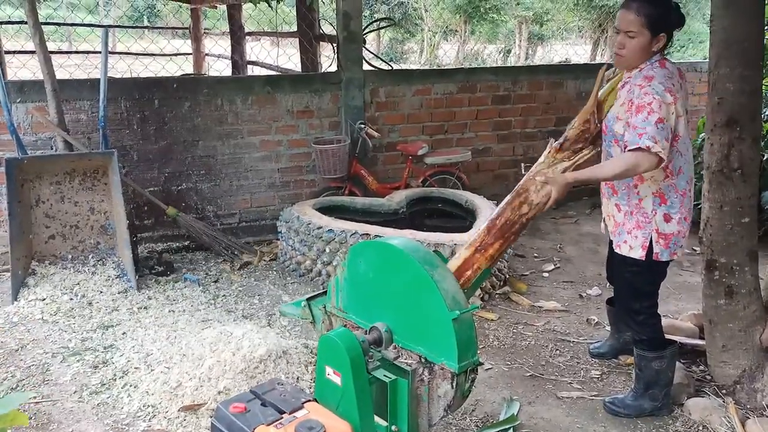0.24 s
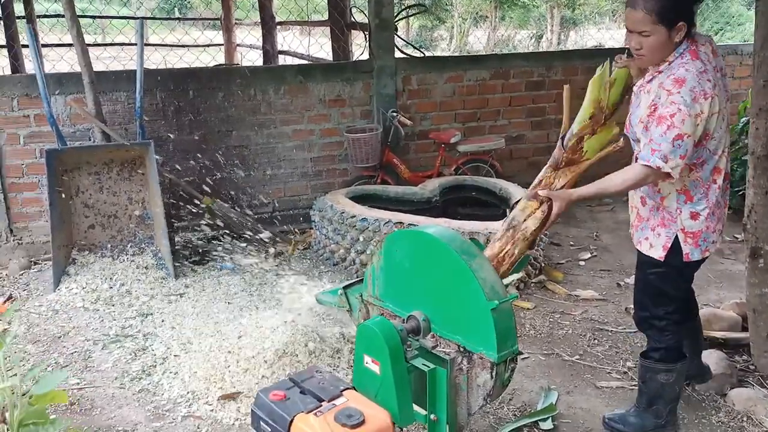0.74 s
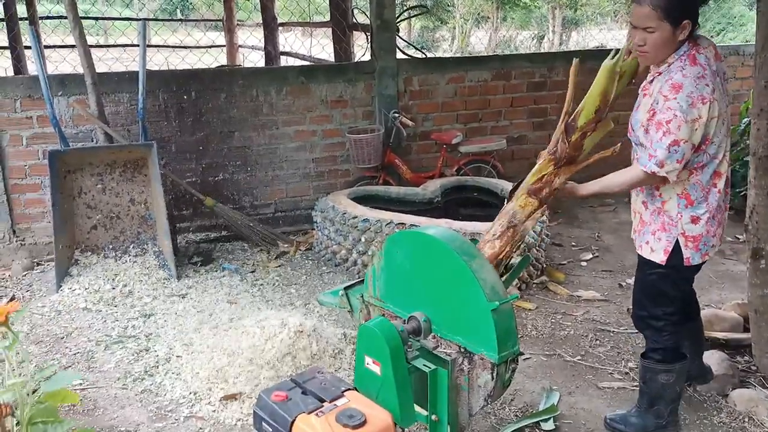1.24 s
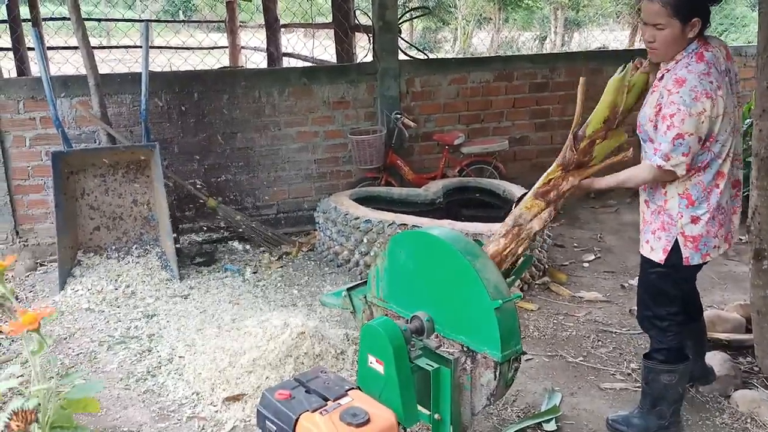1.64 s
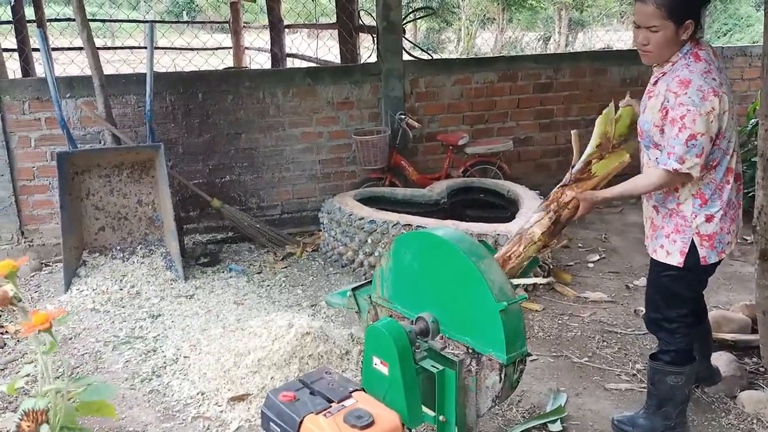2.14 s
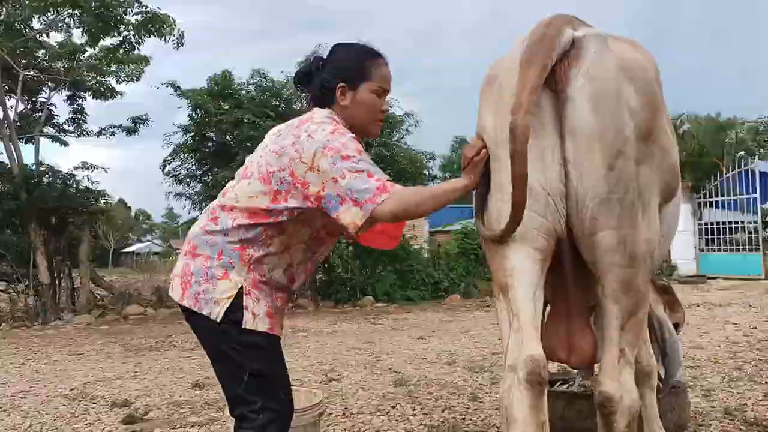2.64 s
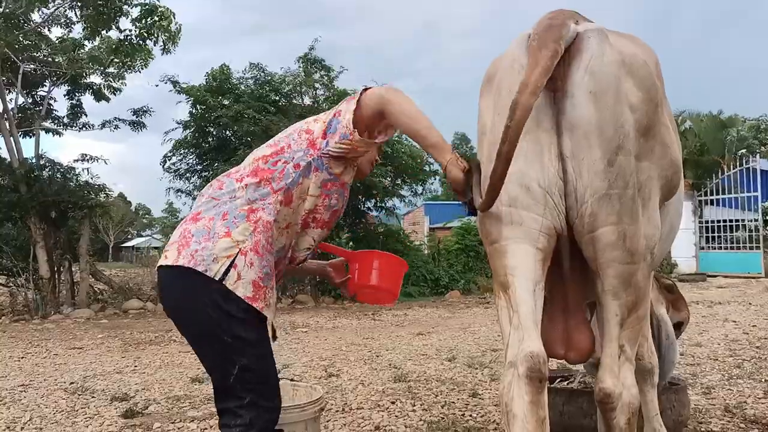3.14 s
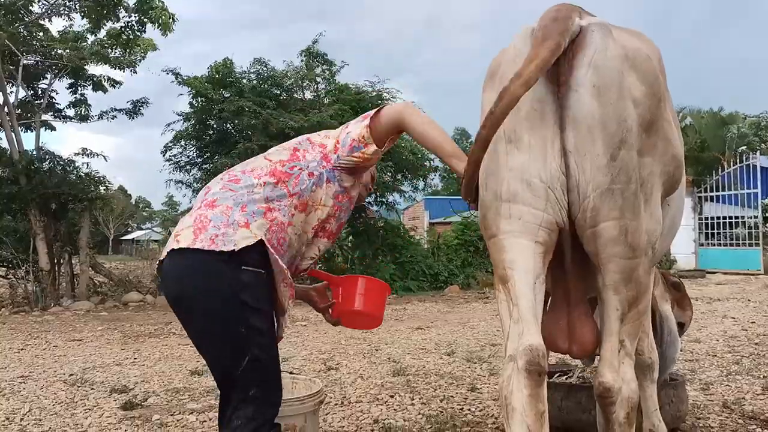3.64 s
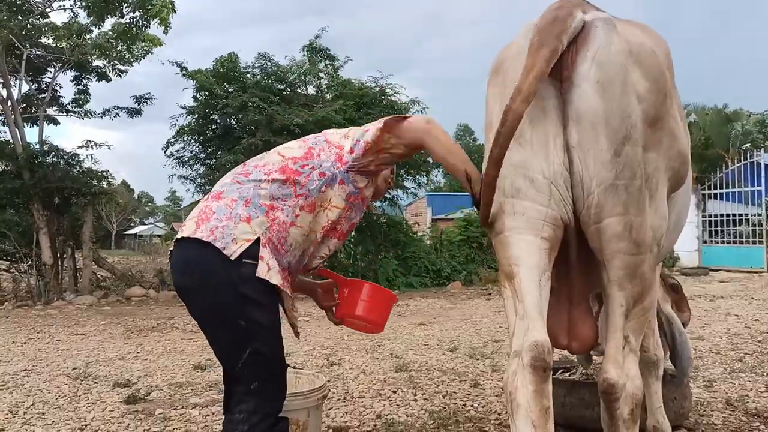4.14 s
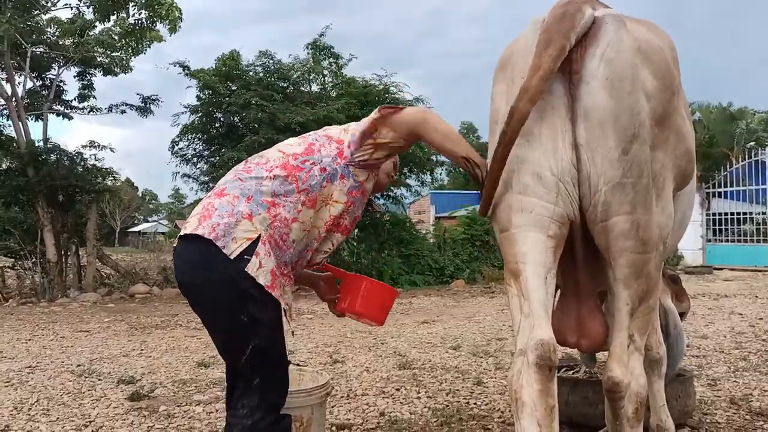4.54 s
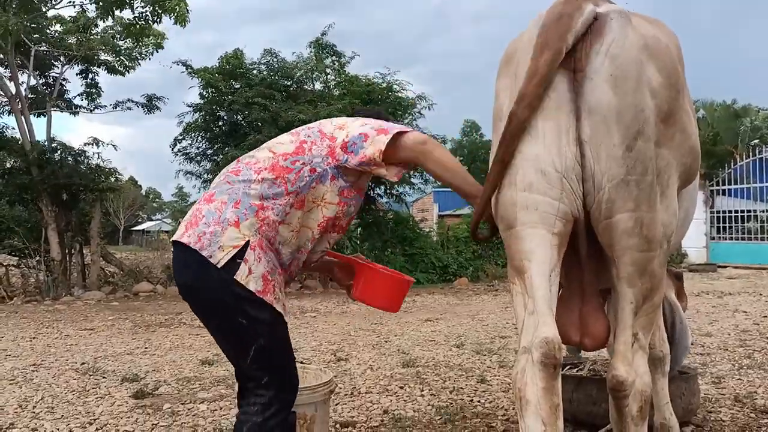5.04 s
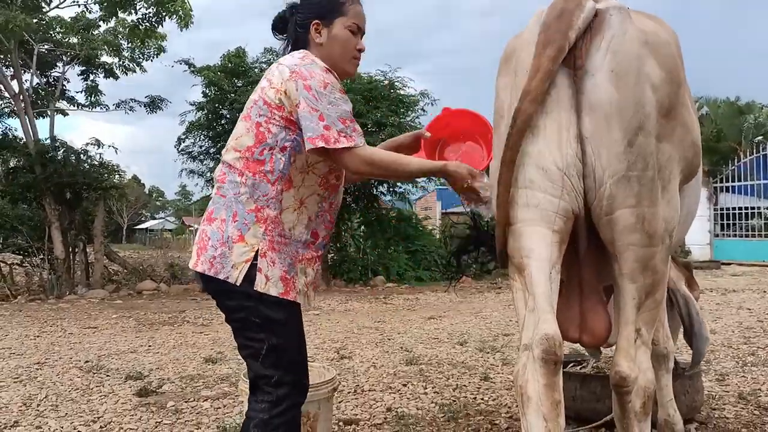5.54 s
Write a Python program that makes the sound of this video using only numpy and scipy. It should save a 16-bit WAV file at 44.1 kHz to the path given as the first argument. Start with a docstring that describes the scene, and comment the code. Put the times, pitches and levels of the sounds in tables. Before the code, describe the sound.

Loud outdoor machine noise, booming exhaust, clanking casing and crackling fibre, slightly overloaded at the microphone. Then a hard cut to calm yard air with low wind bumps and a click on the right. A rooster crows in three bursts, a fainter rooster rasps back, birds whistle, a hand softly rubs hide, and thrown water slaps and drips.

```python
"""First a one-cylinder petrol engine thuds and a forage chopper shreds a stalk: gas pulses boom
through a muffler, knocks ring a steel casing, and dense clicks make the snapping fibre.
Abruptly an open farmyard follows: noise makes the air and the wind buffets, a near rooster crows with
bending, hoarse tones, a quieter one answers and ends in rasps, and gliding tones make small birds.
Meanwhile grains of noise rub a cow's hide, and near the end water splashes and bubbles ring."""
import sys
import numpy as np
from scipy import signal
from scipy.fft import rfft, irfft
from scipy.io import wavfile

SR = 44100
rng = np.random.default_rng(int(sys.argv[2]) if len(sys.argv) > 2 else 0)


def store_pcm(level_fs):
    """Save levels as 16-bit WAV."""
    pcm = np.round(np.clip(level_fs, -1, 1) * 32767).astype(np.int16)
    wavfile.write(sys.argv[1], SR, np.atleast_2d(pcm).T)


N = 256220
T = np.arange(N) / SR  # time of every sample, in seconds

# Engine speed, sagging and recovering. Each row: time in seconds, firings per second.
ENGINE_SPEED = [(.14, 23.58), (.31, 23.84), (.48, 23.27), (.66, 21.83), (.84, 23.04), (1.01, 22.85),
                (1.3, 23.68), (2.16, 24.66), (2.56, 22.92)]
# Gas pulses of one cycle, exhaust then intake. Each row: place as a share of the cycle, signed strength,
# unevenness in dB.
GAS_PULSES = [(-.19, -1., 1.1), (.095, .95, .8)]
# Tone colour of the muffler. Each row: frequency in Hz, relative level in dB.
MUFFLER = [(20, -28), (95, -26), (118, 3), (195, 5), (255, -2.5), (285, 1), (340, -30), (600, -21),
           (12000, -54.5)]
# Boom of the air box, swelling and sinking. Each row: time in seconds, gain at its resonance in dB.
AIR_BOX = [(.38, 3), (.65, -0.5), (.7, 11), (.84, -3), (1.18, -2), (1.52, 8.5), (1.8, 3.5), (2.16, 12.5),
           (2.26, 4)]
# Tone colour of the steel casing. Each row: frequency in Hz, relative level in dB.
CASING = [(30, -7.5), (320, -2), (520, -6.5), (680, -3.5), (1600, -3), (2100, -7.5), (2600, -18),
          (12000, -42.5)]
# Ringing tones of the casing. Each row: frequency in Hz, width in Hz, gain in dB.
CASING_MODES = [(639, 26, -1), (815, 31, 1), (1507, 45, -2)]
# Chunks of stalk tumbling on a panel. Each row: start in seconds, length in seconds, level in dB,
# panel pitch in Hz.
CHUNKS = [(0.428, 0.14, -29, 380), (0.678, 0.32, -34.5, 1300), (1.428, 0.065, -23, 1470),
          (1.882, 0.78, -37.5, 410)]
# Tone colour of the shredded pulp. Each row: frequency in Hz, gain in dB.
PULP = [(500, -8), (2000, 0.5), (4500, 1.5), (9000, -2), (15500, -11.5)]
# The stalk is pushed into the blades. Each row: start in seconds, length in seconds, extra cutting in dB.
FEEDS = [(0.22, 0.27, 5.5), (0.578, 0.24, 3.5), (1.998, 0.47, 4)]
# The blades bite tough fibre. Each row: start in seconds, peak in dB before a shared lift.
BITES = [(0.371, -34), (0.4367, -26.5), (1.4395, -34.5)]

# Syllables of the near crow, one list each. Each row: time in seconds, pitch in Hz, effort in dB,
# beak opening from 0 to 1.
CROW = [
    [(3.033, 785, -51, 0.88), (3.07, 716, -44, 0.58), (3.102, 789, -37.5, 0.86),
     (3.162, 766.5, -35.5, 0.65), (3.184, 737, -50, 0.76), (3.208, 824, -45, 0.9)],
    [(3.35, 739, -46, 0.26), (3.377, 789, -32.5, 0.15), (3.395, 848, -33, 0.72), (3.428, 854, -34.5, 0.7),
     (3.456, 722, -40.5, 0.15)],
    [(3.54, 922, -53, 0.2), (3.572, 760, -35, 0), (3.652, 799, -29, 0.26), (3.672, 779.6, -31, 0.1),
     (3.84, 764, -33, 0.03), (3.905, 738, -33.5, 0.43), (3.95, 709, -46, 0)],
]
# The far rooster's answer. Each row: time in seconds, pitch in Hz, effort in dB, beak opening from 0 to 1.
ANSWER = [(4.15, 772, -48, 0.9), (4.2, 697, -55.5, 0.8), (4.3, 708, -53.5, 0.76), (4.44, 663, -58, 0.83)]
# Hoarse rasps of the far crow. Each row: start in seconds, length in seconds, starting pitch in Hz,
# starting level in dB in the upper throat resonance, then in the lower.
RASPS = [(4.004, 0.22, 567.6, -66, -64.5), (4.43, 0.4, 567, -56.5, -60.5),
         (4.923, 0.049, 535.5, -71, -50.5)]
# Harmonics of the voice with the beak narrow: one relative level in dB each, from the first upward.
BEAK_NARROW = [3, 10, -31.5, -26, -21]
# The same harmonics with the beak wide: one relative level in dB each.
BEAK_WIDE = [-9.5, -1.5, 3.5, -11, -26]
# Small birds' chirps. Each row: start in seconds, starting pitch in Hz, fall as a share of it, level in dB.
CHIRPS = [(4.061, 5370, 0.05, -63), (4.525, 5700, 0.2, -69), (4.89, 5300, 0.15, -67),
          (5.25, 5200, 0.16, -74), (5.39, 4050, .15, -80), (5.57, 3980, .05, -76)]
# Another bird's level whistles. Each row: start in seconds, level in dB.
WHISTLES = [(4.189, -64), (4.827, -64.5), (5.489, -69)]
# Echo of trees and sheds. Each row: frequency in Hz, gain in dB.
YARD_ECHO = [(400, 5), (750, 6.5), (1500, 6.5), (2400, 3.5), (5000, -25)]

# Wind buffets. Each row: start in seconds, length in seconds, level in dB, top frequency in Hz,
# left minus right in dB.
BUFFETS = [(2.565, 0.075, -16, 233, -25), (2.582, 0.013, -20.5, 453, -29), (2.639, 0.046, -12.5, 236, -28),
           (2.737, 0.14, -36.5, 126, -35), (2.889, 0.04, -28, 142, -10), (2.918, 0.18, -34, 153, 19),
           (3.016, 0.0152, -22, 237, 23), (3.726, 0.26, -36, 150, 13), (4.13, 0.036, -38, 226, 1.5),
           (4.628, 0.042, -35, 68.6, -36)]
# Tone colour of the open air. Each row: frequency in Hz, relative level in dB.
AIR = [(15, -25), (25, 6.5), (112, 4.5), (952, -24), (1460, -16), (2800, -26), (7500, -31), (15000, -37)]
# Loudness of the open air. Each row: time in seconds, level in dB.
AIR_LEVEL = [(2.57, -50.5), (5.0, -50.5), (5.48, -57.5), (5.8, -51.5)]
# Tones of a distant hum. Each row: frequency in Hz, relative level in dB.
HUM = [(161.5, -1.5), (323, -9)]
# Loudness of the hum. Each row: time in seconds, level in dB.
HUM_LEVEL = [(3.5, -70), (5.0, -51.5), (5.3, -66.5)]

# A hand strokes wet hide. Each row: time of the peak in seconds, level in dB.
RUBS = [(2.85, -56), (5.02, -64.5)]
# Tone colour of the hide. Each row: frequency in Hz, relative level in dB.
HIDE = [(1000, -17), (3000, -15), (9500, 6)]
# A wet hand slaps; water is thrown, lands and runs off. Each row: start in seconds, level in dB,
# decay in seconds, brightness from 0 to 1.
SPLASHES = [(4.139, -42, 0.039, 0.2), (5.539, -35, 0.043, 0.03), (5.653, -48.5, 0.039, 0.74),
            (5.73, -61, 0.21, 1)]
# Tone colour of sloshing water. Each row: frequency in Hz, relative level in dB.
SLOSH = [(60, 10), (220, -1.5), (400, 0), (650, -20), (2100, -13.5), (3800, -47)]
# Tone colour of spattering water. Each row: frequency in Hz, relative level in dB.
SPRAY = [(700, -3), (1500, 7), (4000, -4)]
# Single drops that trap a bubble. Each row: start in seconds, starting pitch in Hz, level in dB.
DROPS = [(5.68, 4830, -48), (5.694, 1480, -53), (5.715, 7450, -42)]

# Tone colour of the left microphone port. Each row: frequency in Hz, gain in dB.
LEFT_PORT = [(2800, -1.5), (5800, -8), (6700, -20.5), (8000, -7), (9600, 5.5), (11000, -4), (14200, -9.5)]
# Tone colour of the right microphone port. Each row: frequency in Hz, gain in dB.
RIGHT_PORT = [(1500, -1.5), (2400, -3), (4400, 1.5), (6000, 0.5), (7050, 8), (8000, -4.5), (9200, -9.5),
              (9900, -26), (12700, -3), (15400, -1)]
# How alike left and right are. Each row: frequency in Hz, likeness from 0 to 1.
LIKENESS = [(40, 0.2), (150, 1), (600, 0.84), (1400, 0.31), (5000, 0.091)]

CHANGE_S = 2.568  # the chopper gives way to the farmyard
FIRST_CYCLE_S = .0601
CUTTING_DB, FEED_RISE_S, FEED_EASE_S = -37, 0.13, 0.16  # steady cutting; how a push builds and eases
KNOCK_DB = -5  # knocks compared with the rattle
ROOSTER_LAG_S = 0.00041  # it stands to the right, so the left port hears it later
ROUGH_MIDDLE, ROUGH_ENDS, ROUGH_S = 0.057, 0.61, 0.023  # a syllable is hoarse as it starts and stops
DOUBLING, DOUBLING_HZ = 0.36, 820  # above this pitch the syrinx beats strong and weak by turns
VOICE_EDGE_S = 0.0055  # attack and release of a syllable
SECOND_VOICE_HZ, SECOND_VOICE_DB, SECOND_VOICE_S = 579, -53.5, 0.11  # other side of the syrinx, sliding up
RASP_SAG_HZ_PER_S, RASP_FADE_DB_PER_S, RASP_EDGE_S = 98, 18, 0.018
RASP_PULSE_HZ, RASP_PULSE_DB = 11.16, 4.5  # the rasp comes in throbs
CHIRP_S, BIRD_FLUTTER_DB = 0.1, 3.5
WHISTLE_S, WHISTLE_HZ = 0.13, 3220
BUBBLE_CYCLES, BUBBLE_RISE = 17, 0.025  # cycles until it has died to a third; share its pitch rises meanwhile
PATTER_S, PATTER_HZ, PATTER_DB = 5.655, 1062, -54.5  # random drops: earliest start, lowest pitch, top level
EDGE_HZ = 15650  # upper limit of the sound


def amp(db):
    """Turn decibels into a plain multiplier."""
    return 10 ** (np.asarray(db) / 20)


def unit(x):
    """Scale a sound to an average (rms) strength of 1."""
    return x / np.sqrt(np.mean(x ** 2) + 1e-20)


def curve(rows):
    """Join timed points with straight lines."""
    return np.interp(T, *np.transpose(rows))


def read(points, hz):
    """Read a table between its frequencies, on a logarithmic pitch scale."""
    f, value = np.transpose(points)
    return np.interp(np.log(hz + 1), np.log(f + 1), value)


def add(mix, s, sound):
    """Lay a sound into the mix from second s."""
    part = mix[..., round(s * SR):][..., :sound.shape[-1]]
    part += sound[..., :part.shape[-1]]


def gate(t, length, rise, release):
    """Attack, hold and release, from 0 to 1."""
    return np.sin(np.pi / 2 * np.clip(np.minimum(t / rise, (length - t) / release), 0, 1)) ** 2


def colour(x, points):
    """Filter a sound to the given spectrum, without any sound ahead of its cause."""
    size = 4096
    log_gain = np.log(amp(read(points, abs(np.fft.fftfreq(size, 1 / SR)))))
    taps = np.fft.ifft(np.exp(np.conj(signal.hilbert(log_gain)))).real
    return signal.oaconvolve(np.atleast_2d(x), taps[None, :size // 2], axes=1)[:, :N]


def ring(x, hz, width):
    """Pass a sound through a resonance of gain 1."""
    return signal.lfilter(*signal.iirpeak(hz, hz / width, SR), x)


def wander(hz, count=N):
    """Random drift with changes up to about hz, scaled to rms 1 over the full length."""
    noise = rfft(rng.standard_normal(N))
    return unit(irfft(noise / (1 + (np.fft.rfftfreq(N, 1 / SR) / hz) ** 4), N))[:count]


def spread(pair):
    """Make two unrelated signals a port pair: more alike in the bass than in the treble."""
    a, b = rfft(pair)
    same = np.clip(read(LIKENESS, np.fft.rfftfreq(N, 1 / SR)), 0, 1)
    mid, side = a * np.sqrt((1 + same) / 2), b * np.sqrt((1 - same) / 2)
    return irfft(np.array([mid + side, mid - side]), N)


def grains(per_s, spread_db):
    """Random clicks of uneven size, reaching both ports."""
    size = amp(spread_db * np.minimum(rng.exponential(1, N), 4)) * (rng.random(N) < per_s / SR)
    return unit(size * rng.standard_normal((2, N)))


def echoes(x, t60):
    """A tail of scattered reflections, different for each port, falling 60 dB in t60 seconds."""
    t = T[:SR]
    tail = rng.standard_normal((2, SR)) * (rng.random(SR) < .1) * amp(-60 * t / t60)
    return signal.oaconvolve(np.atleast_2d(x), tail / np.linalg.norm(tail[0]), axes=1)[:, :N]


def farmyard():
    """Quiet open air is coloured noise; the distant hum is two wavering tones."""
    air = amp(curve(AIR_LEVEL)) * unit(colour(spread(rng.standard_normal((2, N))), AIR))
    hum = 0
    for hz, db in HUM:
        pitch = hz * (1 + 0.02864 * wander(21.4))
        hum = hum + amp(db) * np.sin(2 * np.pi * np.cumsum(pitch) / SR)
    return air + amp(curve(HUM_LEVEL)) * unit(hum)


def wind():
    """Each eddy pushes on the ports with a short low rumble, mostly on one side."""
    out = np.zeros((2, N))
    for s, length, db, top_hz, pan_db in BUFFETS:
        lowpass = signal.butter(4, top_hz, fs=SR, output="sos")
        eddy = signal.sosfilt(lowpass, rng.standard_normal(SR))[-int(length * SR):]
        eddy = (eddy - eddy.mean()) * signal.windows.tukey(len(eddy), .5)
        sides = unit(amp([[pan_db / 2], [-pan_db / 2]]))
        add(out, s, amp(db) * sides * unit(eddy))
    return out


def drips():
    """Each bubble rings for a few cycles, rising in pitch as it nears the surface."""
    out = np.zeros(N)
    patter = []
    for when, high, weak in rng.random(size=(20, 3)):
        start = PATTER_S + when * (T[-1] - PATTER_S)
        patter.append((start, PATTER_HZ * 2 ** (2 * high), PATTER_DB - 10 * weak))
    for s, hz, db in list(DROPS) + patter:
        age = T[:SR // 10] * hz / BUBBLE_CYCLES
        tone = np.sin(2 * np.pi * BUBBLE_CYCLES * age * (1 + BUBBLE_RISE * age / 2))
        add(out, s, amp(db) * (1 - np.exp(-10 * age)) * np.exp(-age) * tone)
    return out


def washing():
    """A hand strokes the wet hide in fine grains; then water sloshes and spatters on the cow."""
    strokes = sum(amp(db) * np.exp(-((T - s) / 0.085) ** 2) for s, db in RUBS)
    out = strokes * unit(colour(grains(per_s=9000, spread_db=2), HIDE))
    slosh = unit(colour(spread(grains(per_s=1500, spread_db=2.4)), SLOSH))
    drops = grains(per_s=4000, spread_db=1.8)
    spray = unit(colour(drops + echoes(drops, t60=.03), SPRAY))
    for s, db, decay, bright in SPLASHES:
        age = np.maximum(T - s, 0)
        level = amp(db) * (1 - np.exp(-age / 0.0011)) * np.exp(-age / decay)
        out += level * ((1 - bright) * slosh + bright * spray)
    return out


def birdnote(s, length, start_hz, fall, db):
    """A trembling, fluttering tone that glides down by the share fall."""
    hz = start_hz * np.linspace(1, 1 - fall, int(length * SR))
    hz = hz * (1 + (.004 + fall / 10) * wander(200, count=len(hz)))
    level = amp(db + BIRD_FLUTTER_DB * wander(60, count=len(hz))) * np.hanning(len(hz)) ** .5
    return s, level * np.sin(2 * np.pi * np.cumsum(hz) / SR)


def rasp(s, length, hz, upper_db, lower_db):
    """The voice breaks up into a hoarse, throbbing, sagging band in each of two throat resonances."""
    t = np.arange(0, length, 1 / SR)
    pitch = hz * (1 + .015 * wander(25, count=len(t))) - RASP_SAG_HZ_PER_S * t
    phase = 2 * np.pi * np.cumsum(pitch) / SR
    out = 0
    for k, db in ((4, upper_db), (1, lower_db)):  # the upper band lies at four times the pitch
        hoarse = sum(part(k * phase) * wander(65, count=len(t)) for part in (np.cos, np.sin))
        out = out + amp(db) * unit(hoarse)
    throb_db = -RASP_PULSE_DB * np.cos(2 * np.pi * RASP_PULSE_HZ * t)
    return s, out * gate(t, length, RASP_EDGE_S, RASP_EDGE_S) * amp(throb_db - RASP_FADE_DB_PER_S * t)


def syllable(points):
    """A syrinx tone that bends and breaks, two-voiced at first; the beak shifts its harmonics."""
    times, *columns = np.transpose(points)
    t = np.arange(0, times[-1] - times[0], 1 / SR)
    hz, db, beak = (np.interp(times[0] + t, times, column) for column in columns)
    beak = np.clip(beak, 0, 1)
    rough = ROUGH_MIDDLE + ROUGH_ENDS * (np.exp(-t / ROUGH_S) + np.exp((t - t[-1]) / ROUGH_S))
    phase = 2 * np.pi * np.cumsum(hz * (1 + .05 * rough * wander(130, count=len(t)))) / SR
    tone = 0
    for k, (narrow, wide) in enumerate(zip(BEAK_NARROW, BEAK_WIDE), 1):
        tone = tone + amp(narrow + beak * (wide - narrow)) * np.cos(k * phase)
    # half the pitch in the loudness makes every other beat stronger
    doubling = DOUBLING * np.clip((hz - DOUBLING_HZ) / 10, 0, 1)
    tone = tone * (1 + doubling * np.cos(phase / 2))
    tone = tone * (1 + rough * wander(160, count=len(t)))
    tone = signal.sosfilt(signal.butter(3, 2700, fs=SR, output="sos"), tone)
    second = np.sin(2 * np.pi * SECOND_VOICE_HZ * t * (1 + t / 2))
    second = second * amp(SECOND_VOICE_DB) * gate(t, SECOND_VOICE_S, SECOND_VOICE_S / 2, SECOND_VOICE_S / 2)
    return times[0], (amp(db) * unit(tone) + second) * gate(t, t[-1], VOICE_EDGE_S, VOICE_EDGE_S)


def fowl():
    """Two roosters and small birds, with the echo of trees and sheds."""
    near, far = np.zeros(N), np.zeros(N)
    for s, hz, fall, db in CHIRPS:
        add(far, *birdnote(s, CHIRP_S, hz, fall, db))
    for s, db in WHISTLES:
        add(far, *birdnote(s, WHISTLE_S, WHISTLE_HZ, 0, db))
    for row in RASPS:
        add(far, *rasp(*row))
    add(far, *syllable(ANSWER))
    for points in CROW:
        add(near, *syllable(points))
    direct = np.array([np.interp(T - ROOSTER_LAG_S, T, near), near])
    echo = echoes(colour(.18 * near + .55 * far, YARD_ECHO), t60=.5)
    return direct + far + spread(echo)


def pushes():
    """Extra cutting dB: it builds with each push of the stalk and eases off after it."""
    total_db = 0
    for s, length, db in FEEDS:
        build = np.clip((T - s) / FEED_RISE_S, 0, 1)
        ease = np.exp(-np.maximum(T - s - length, 0) / FEED_EASE_S)
        total_db = total_db + db * build * ease
    return total_db


def bites():
    """The blades' extra force on tough fibre: sudden, then fading."""
    return sum(amp(db + 2.5) * (T > s) * np.exp(-abs(T - s) / 0.0084) for s, db in BITES)


def cutting():
    """Force on the blades: steady cutting, swelling with each push, plus the bites."""
    return amp(CUTTING_DB + pushes()) + bites()


def pulses(cycles, place, uneven_db, jitter):
    """One click a cycle, each a little different in size and moment (jitter in seconds)."""
    at = np.flatnonzero(np.diff(np.floor(cycles - place)))
    size, late = rng.standard_normal((N // 1000, 2))[:len(at)].T
    out = np.zeros(N)
    out[np.clip(at + (late * jitter * SR).astype(int), 0, N - 1)] = amp(uneven_db * size)
    return out


def blades(cycles):
    """Wet fibre snaps in dense grains, loudest as a blade passes, three times a cycle."""
    fibre = grains(per_s=22000, spread_db=1.) * amp(.8 * np.cos(2 * np.pi * 3 * cycles))
    return amp(5.5) * colour(cutting() * fibre, PULP)


def clatter(cycles):
    """Knocks, loose parts and pulp ring the casing, harder with more cutting; chunks drum on panels."""
    rattle = spread(grains(per_s=4000, spread_db=1.8))
    # moving parts knock around the same 40 places in every cycle
    knocks = sum(rng.standard_normal() * pulses(cycles, place, 2, jitter=.0001)
                 for place in rng.random(size=40))
    blows = rattle + amp(KNOCK_DB) * unit(knocks)
    steel = blows + sum(amp(db) * ring(blows, hz, width) for hz, width, db in CASING_MODES)
    load_db = 20 * np.log10(cutting()) - CUTTING_DB  # above steady cutting
    shake_db = .5 * np.cos(2 * np.pi * cycles)
    out = amp(-22.5 + 0.4 * load_db + shake_db) * unit(colour(steel, CASING))
    for s, length, db, hz in CHUNKS:
        panel = unit(ring(ring(rattle, hz, hz / 2), hz, hz / 2))
        out = out + amp(db) * gate(T - s, length, length / 10, length / 2) * panel
    return out


def engine(cycles):
    """Exhaust and intake pulses boom through the muffler and ring the air box, over turbulent gas."""
    gas = sum(strength * pulses(cycles, place, uneven, jitter=.00015)
              for place, strength, uneven in GAS_PULSES)
    gas = gas + (amp(curve(AIR_BOX)) - 1) * ring(gas, 185.4, 20)  # the air box rings on between pulses
    turbulence = unit(colour(spread(rng.standard_normal((2, N))), MUFFLER))
    turbulence = amp(-19 + 1.5 * pushes()) * turbulence
    return amp(-23.5) * (unit(colour(gas, MUFFLER)) + turbulence)


def scene():
    """The chopper runs, then the farmyard takes over within 2 milliseconds; wind lies over both."""
    cycles = np.cumsum(curve(ENGINE_SPEED)) / SR
    cycles = cycles - np.interp(FIRST_CYCLE_S, T, cycles)
    running = np.clip((CHANGE_S - T) * 500 + 1, 0, 1)
    chopper = engine(cycles) + clatter(cycles) + blades(cycles)
    yard = farmyard() + fowl() + washing() + drips()
    return running * chopper + (1 - running) * yard + wind()


def record(dry):
    """Loud sound overloads the ports, the right one clicks once, each adds its colour; then a top limit."""
    ports = .65 * np.tanh(dry / .65)
    add(ports[1], 2.68, amp(-7.5) * np.exp(-T[:SR // 100] / 0.0018))
    ports = np.vstack([colour(ports[0], LEFT_PORT), colour(ports[1], RIGHT_PORT)])
    lowpass = signal.firwin(511, EDGE_HZ, window=("kaiser", 9), fs=SR)
    return signal.oaconvolve(ports, lowpass[None], "same")


dry = scene()
out = record(dry)
store_pcm(out)
```